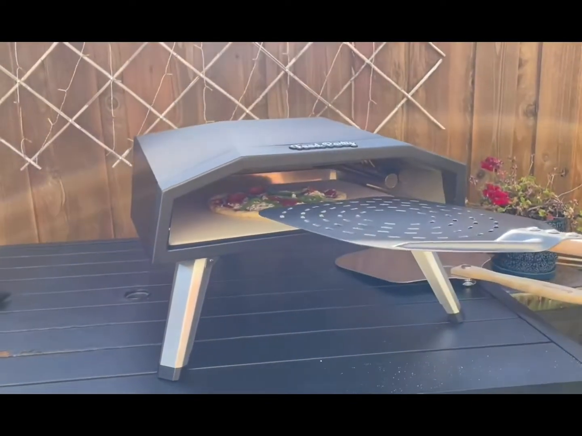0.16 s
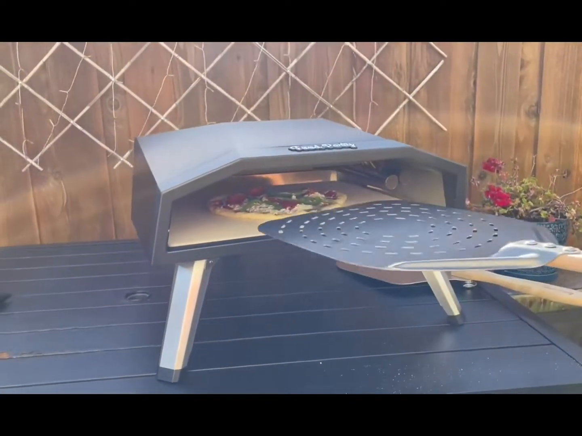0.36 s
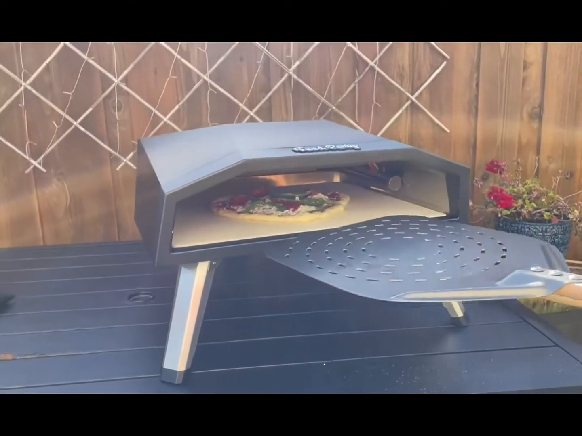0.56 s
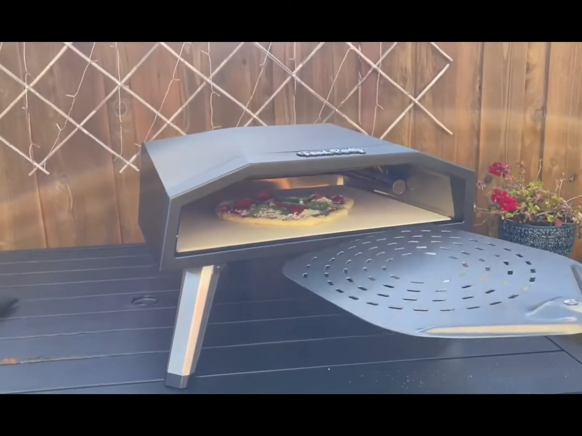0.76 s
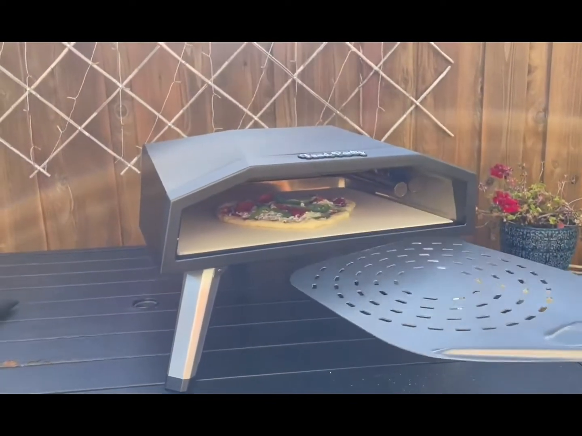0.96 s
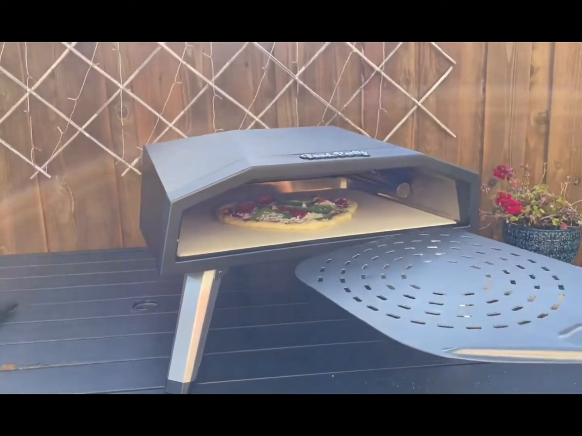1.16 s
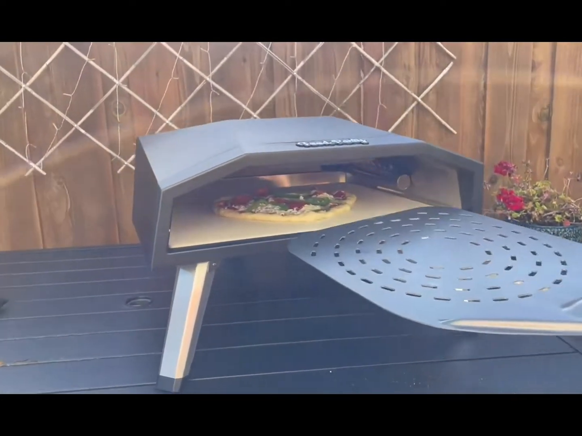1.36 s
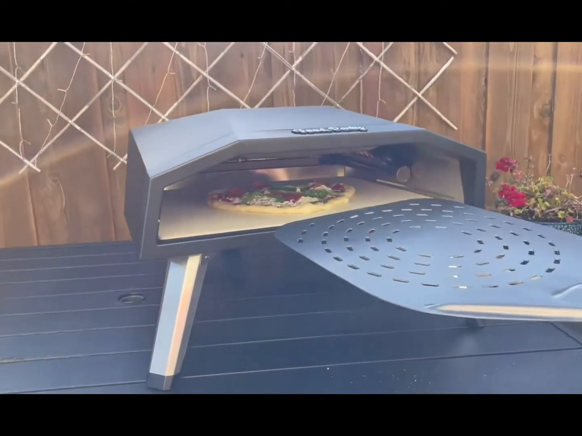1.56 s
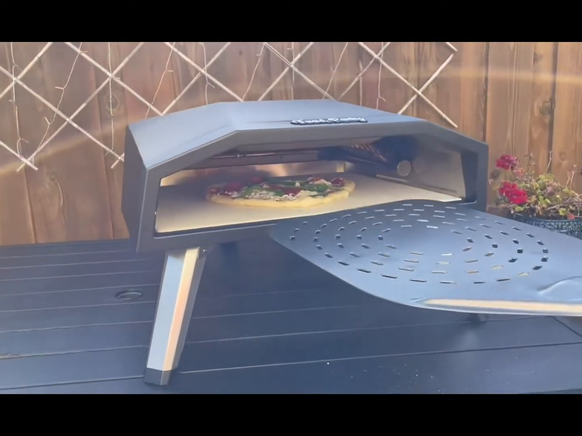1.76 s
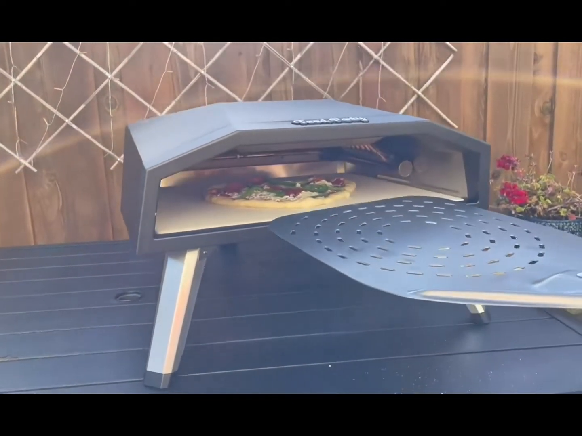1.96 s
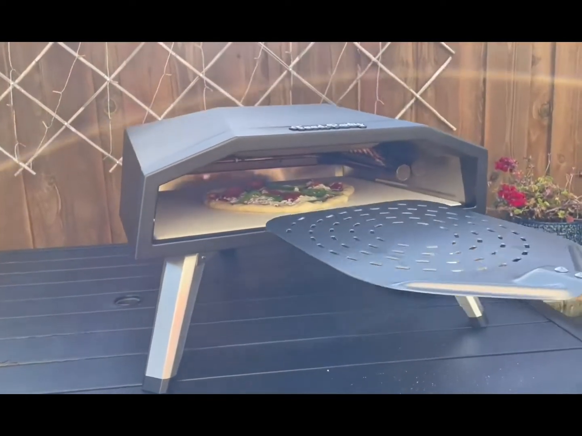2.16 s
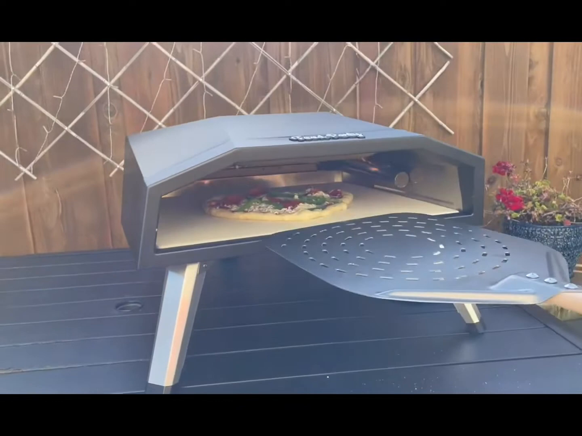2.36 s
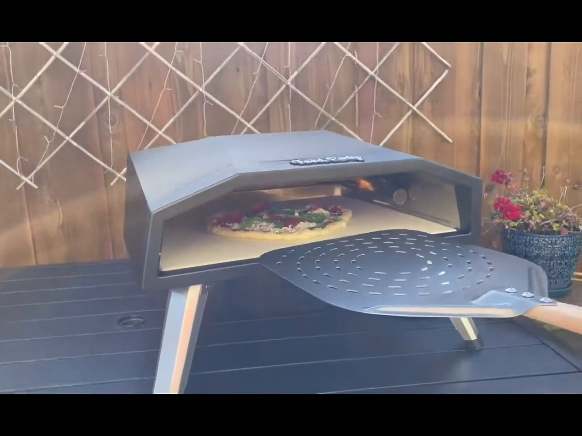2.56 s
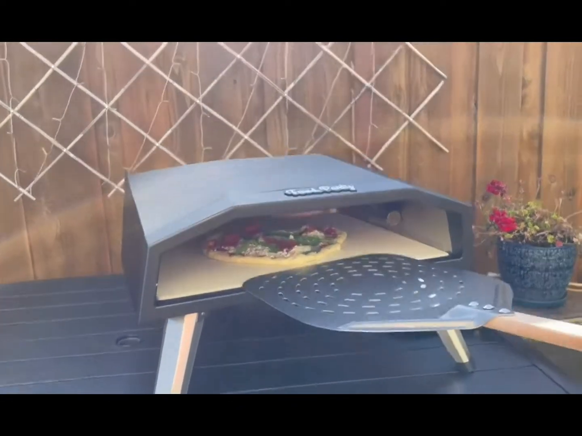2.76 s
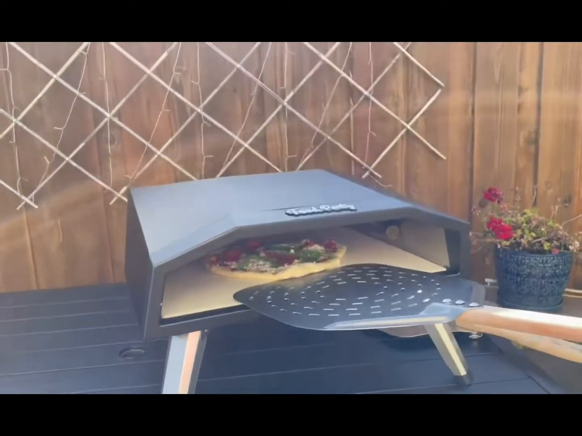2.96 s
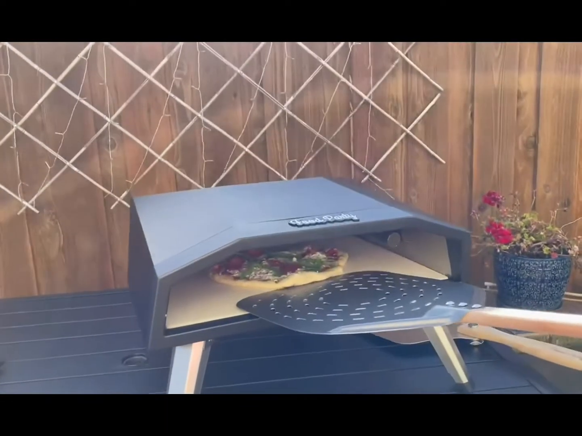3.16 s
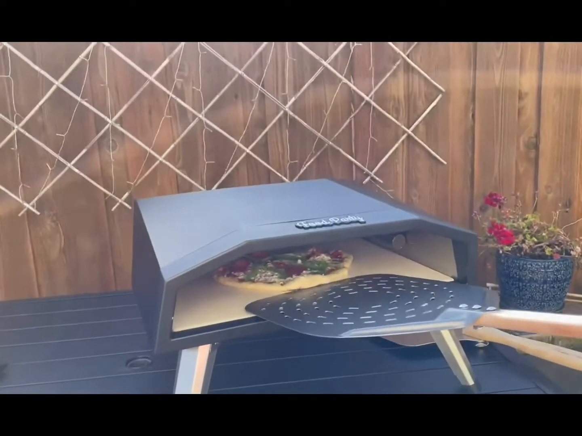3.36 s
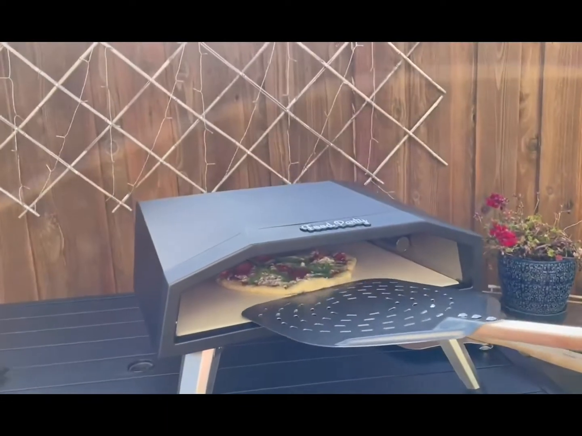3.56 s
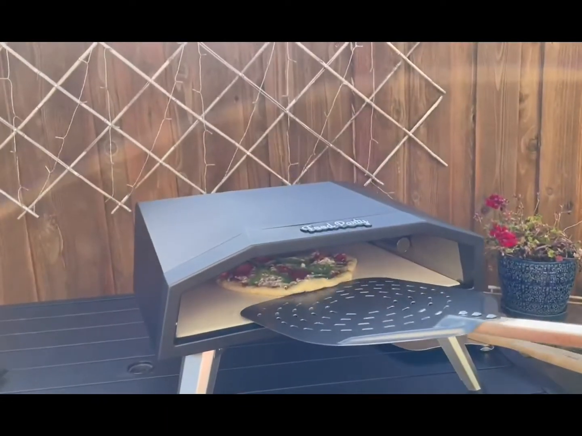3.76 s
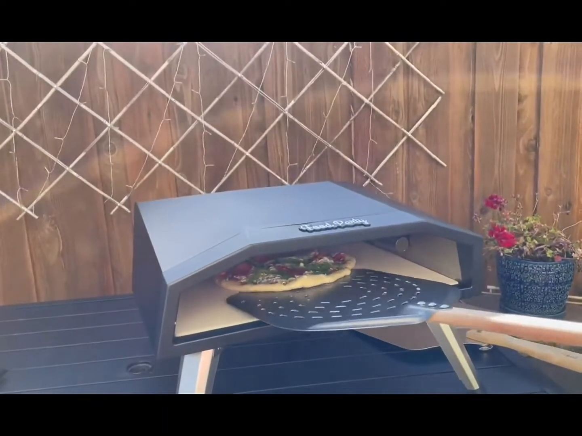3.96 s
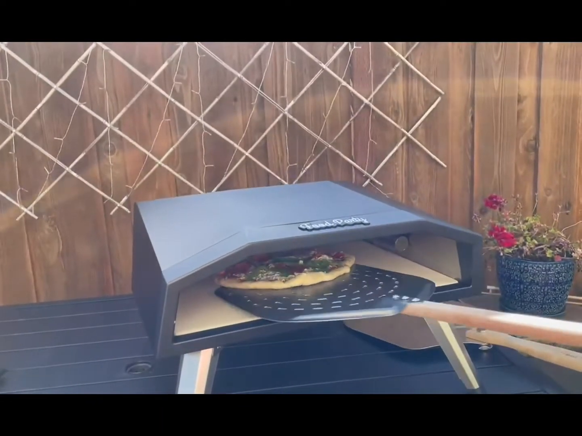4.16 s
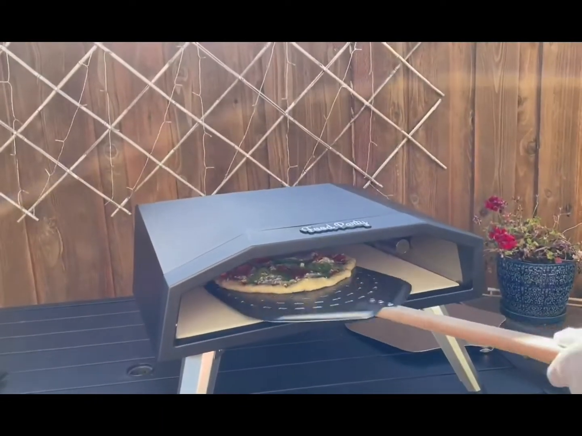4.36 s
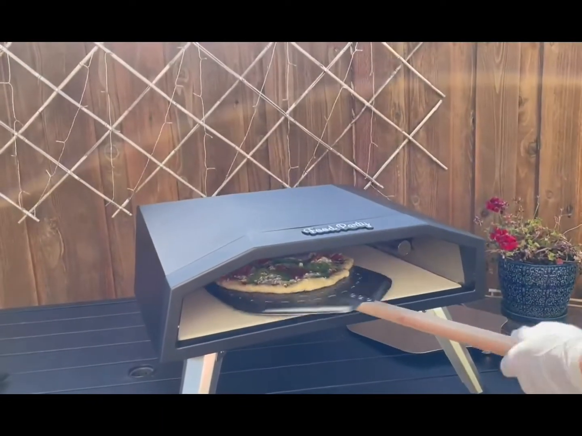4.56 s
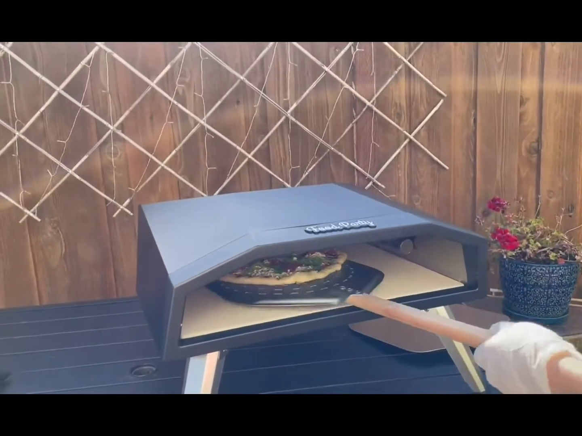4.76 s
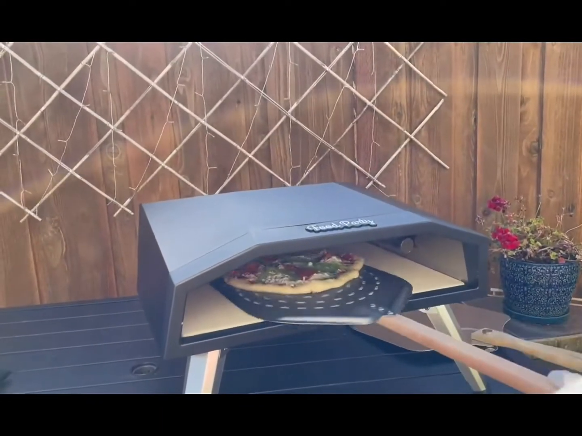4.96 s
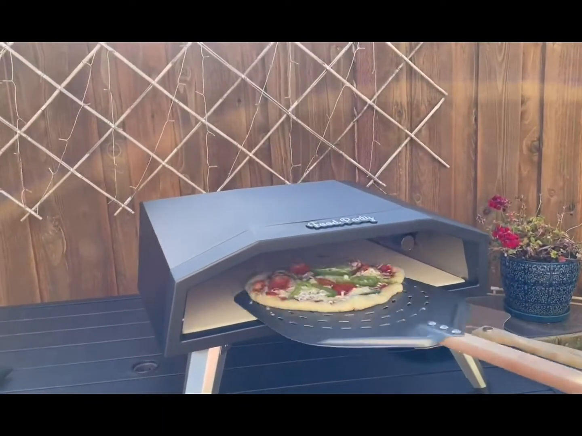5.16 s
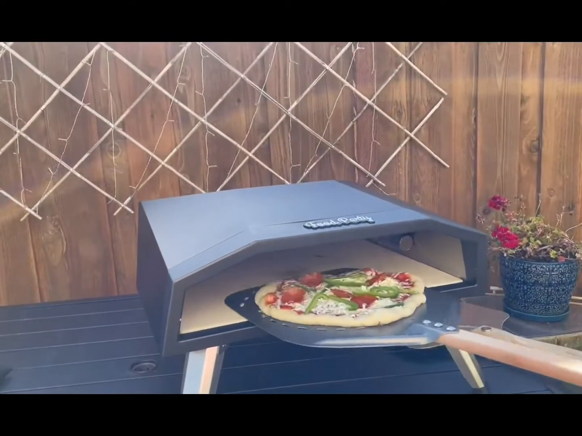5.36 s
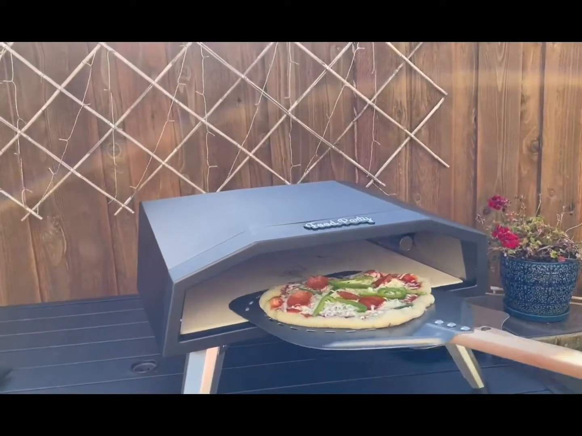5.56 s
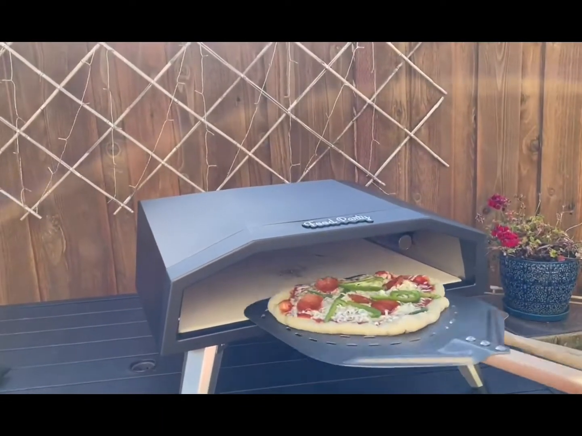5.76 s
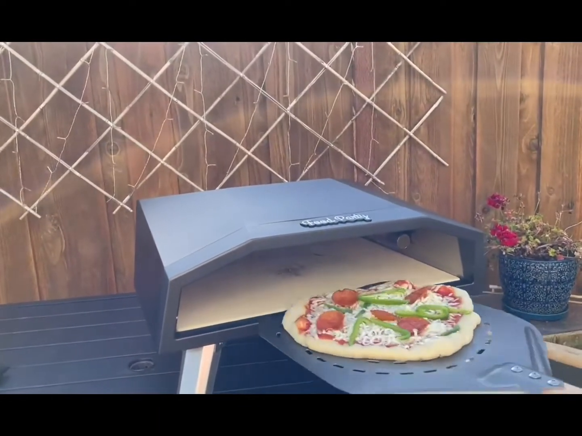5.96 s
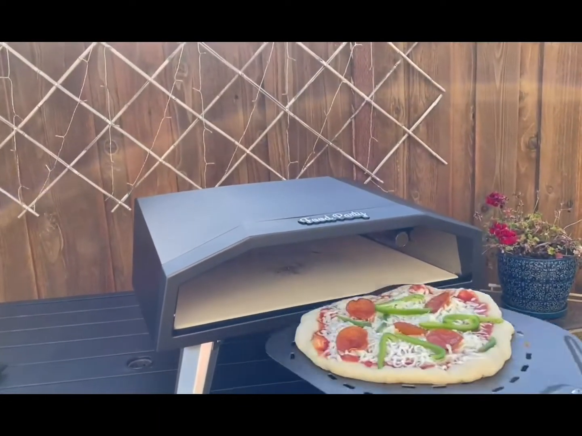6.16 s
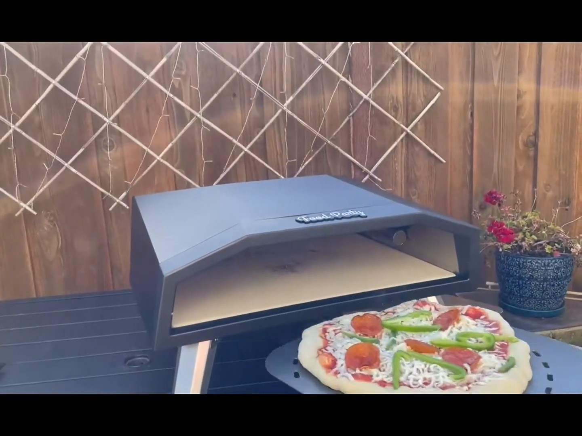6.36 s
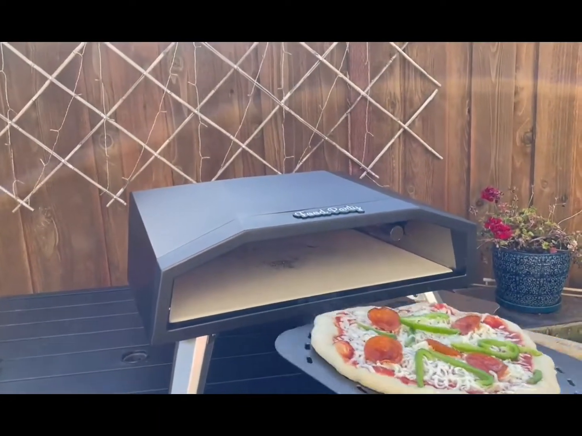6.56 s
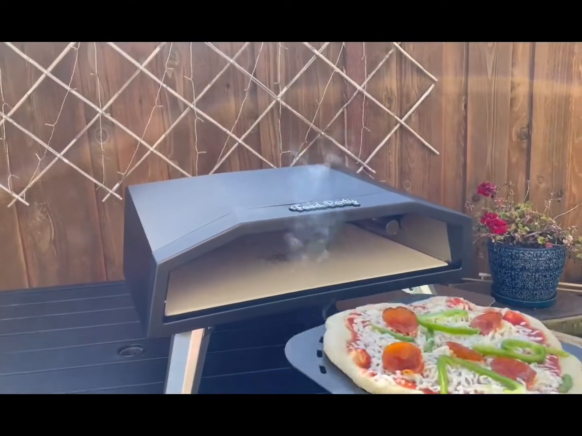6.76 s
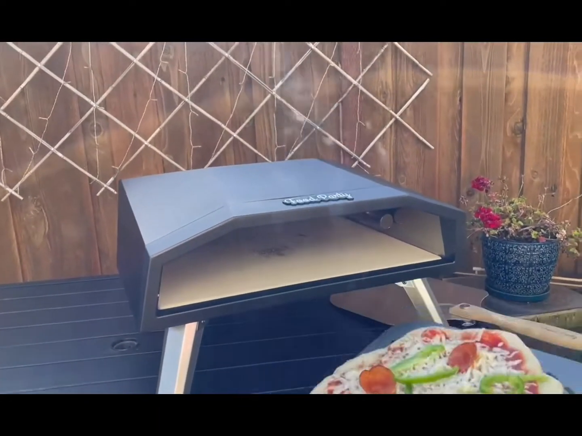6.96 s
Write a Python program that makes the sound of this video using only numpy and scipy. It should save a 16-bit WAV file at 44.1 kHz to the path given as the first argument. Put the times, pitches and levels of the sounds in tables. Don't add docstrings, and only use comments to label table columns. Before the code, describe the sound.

Close outdoor stereo sound at a small gas pizza oven: soft flame hiss and sparse hot-metal ticks first, then wind thumps as a peel edge clatters on stone. Juddering, bright, sandy scrapes follow, strongest midway, with metallic ringing and a low gust. The loaded sheet sounds duller as it draws out, with hard taps and crusty clicks. Lastly, calm air, tiny clicks and a far steady machine tone.

```python
import sys
import numpy as np
from scipy import signal
from scipy.fft import rfft, irfft, dct, next_fast_len
from scipy.io import wavfile
from scipy.ndimage import uniform_filter1d

SR = 44100
rng = np.random.default_rng(int(sys.argv[2]) if len(sys.argv) > 2 else 0)


def unload_audio(sound):
    columns = np.transpose(np.atleast_2d(sound))
    steps = np.round(np.clip(columns, -1, 1) * 32767)
    wavfile.write(sys.argv[1], SR, steps.astype(np.int16))


def rack_gain(trim_db):
    fader = np.asarray(trim_db, float)
    return 10 ** (fader / 20)


N = 310023


def rms_one(x):
    return x / np.sqrt(np.mean(x ** 2) + 1e-20)


def in_time(rows, outside_db=None):
    s, *columns = np.transpose(rows)
    return [np.interp(np.arange(N) / SR, s, c, outside_db, outside_db) for c in columns]


def colour(x, points):
    hz, level_db = np.transpose(points)
    bins = np.arange(N // 2 + 1) * SR / N + 1
    gain = rack_gain(np.interp(np.log(bins), np.log(hz), level_db, -90, -90))
    return rms_one(irfft(rfft(x) * gain, N))


def drift(rate_hz):
    r = np.exp(-64 * np.pi * rate_hz / SR)
    noise = rng.standard_normal(N // 32 + 2002)
    slow = signal.lfilter([1], [1, -2 * r, r * r], noise)[2000:]
    return np.interp(np.arange(N) / 32, np.arange(len(slow)), rms_one(slow))


def ring(x, hz, t60):
    r, w = rack_gain(-60 / (t60 * SR)), 2 * np.pi * hz / SR
    return signal.lfilter([0, np.sin(w)], [1, -2 * r * np.cos(w), r * r], x + 1e-18)


def band(x, low_hz, high_hz):
    return signal.sosfilt(signal.butter(2, [low_hz, min(high_hz, .45 * SR)], "band", fs=SR, output="sos"), x)


def bursts(times, levels_db, t60s, rises):
    out, t = np.zeros(N), np.arange(SR // 4) / SR
    for s, level_db, t60, rise in np.broadcast(times, levels_db, t60s, np.maximum(rises, 1e-4)):
        i = round(s * SR)
        fall = rack_gain(level_db - 60 * np.maximum(t - rise, 0) / max(t60, .002))
        shape = fall * np.minimum(t / rise, 1) ** 2
        out[i:i + len(t)] += shape[:N - i]
    return out


def swells(rows, power):
    out = np.zeros(N)
    for s, rise, fall, level_db in rows:
        i = np.arange(max(round((s - rise) * SR), 0), min(round((s + fall) * SR), N))
        away = np.where(i < s * SR, (s - i / SR) / rise, (i / SR - s) / fall)
        out[i] += rack_gain(level_db) * np.cos(np.pi / 2 * np.clip(away, 0, 1)) ** power
    return out


def grains(per_s, spread_db):
    sizes = rack_gain(spread_db * np.minimum(rng.exponential(1, N), 5)) * rng.choice([-1, 1], N)
    return sizes * (rng.random(N) < per_s / SR)


def sheet(force, modes, wander_db):
    return sum(ring(force * rack_gain(level_db + wander_db * drift(1.8)), hz, t60) * (-1) ** k
               for k, (hz, level_db, t60) in enumerate(modes))


# f/Hz, level/dB, time to fade by 60 dB [s]
SHEET_MODES = [(632, -12, .18), (764, -15, .16), (1071, -19, .25), (1400, -16, .35), (1723, -15, .22),
               (2207, -20, .15), (2392, -20, .2), (2572, -11, .3), (2840, -12, .12), (3058, -13, .12),
               (3312, -8, .28), (3494, -13, .18), (3850, -14, .08), (4088, -10, .12), (4420, -13, .15),
               (4865, -15, .09), (5322, -8, .16), (5920, -12, .13), (6400, -11, .12)]
# f/Hz, level/dB per Hz
BODY_COLOUR = [(250, -37), (500, -7), (1000, -6), (1600, -4), (2400, -4), (3500, -0.5), (5300, -1.5),
               (8000, -6)]
# f/Hz, level/dB per Hz
GRIT_COLOUR = [(5000, -10.5), (7500, -8), (10000, 0.5), (11500, -0.5), (13200, 1), (14300, -6.5),
               (15000, -9), (16000, -14), (17500, -58)]


def peel():
    (grit, pressure), (crack, rattle) = scrape(), taps()
    hiss = (grit + crack) * colour(grains(9000, spread_db=2.0), GRIT_COLOUR)
    friction = grains(4000, spread_db=2.6)
    loaded_db = in_time([(2.6, 5), (3.6, -1), (4.1, -6), (4.6, -8), (5.4, -11)])[0]
    rubbing = rack_gain(-3.0) * (pressure + rattle) * colour(friction, BODY_COLOUR)
    body = dense_modes(rubbing, friction, 0.45 * loaded_db)
    drive = rack_gain(-43) * pressure + rack_gain(-42) * rattle
    force = rack_gain(loaded_db) * drive * rms_one(grains(3000, spread_db=3.5))
    ringing = sheet(force, SHEET_MODES, wander_db=3.5)
    return patchy(hiss, 7000, 16000, patch_db=1.0) + patchy(body, 600, 7440, patch_db=1.0) + ringing


# fastest moment t/s, speeding up [s], slowing [s], grit hiss level/dB,
# sheet body level/dB relative to the hiss
PUSHES = [(2.425, 0.0086, 0.13, -48, 0), (2.624, 0.021, 0.11, -38.5, 0), (2.703, 0.071, 0.078, -41, -2),
          (2.859, 0.17, 0.15, -31.5, -11.5), (3.063, 0.079, 0.048, -34.5, -10),
          (3.155, 0.063, 0.11, -39, -8), (3.327, 0.061, 0.23, -43.5, -9.5), (3.443, 0.094, 0.18, -39, -9.5),
          (3.59, 0.081, 0.062, -37.5, -11.5), (3.645, 0.098, 0.086, -30.5, -12),
          (3.69, 0.057, 0.024, -35, -9), (3.765, 0.08, 0.064, -32, -11), (3.805, 0.05, 0.053, -33.5, -14),
          (3.915, 0.11, 0.13, -24, -8.5), (3.96, 0.032, 0.012, -35, -5), (4.128, 0.057, 0.045, -31.5, -7.5),
          (4.165, 0.057, 0.096, -28.5, -5), (4.257, 0.015, 0.034, -42.5, -5),
          (4.325, 0.036, 0.061, -35, -4), (4.37, 0.058, 0.11, -31.5, -4), (4.55, 0.056, 0.088, -39, -3.5),
          (4.625, 0.099, 0.09, -40, -3.5), (4.892, 0.18, 0.048, -41, -6.5)]
DRAWS = [(5.012, 0.4, 0.47, -64, 9), (5.143, 0.047, 0.017, -39, -11), (5.173, 0.027, 0.047, -37.5, -10.5),
         (5.23, 0.029, 0.036, -34.5, -11.5), (5.318, 0.11, 0.077, -36, -9),
         (5.451, 0.11, 0.037, -35.5, -5.5), (5.52, 0.068, 0.065, -45, -4),
         (5.582, 0.056, 0.021, -48.5, 1.5), (5.657, 0.044, 0.11, -50.5, -10), (5.741, 0.13, 0.12, -36, -5),
         (5.893, 0.063, 0.078, -36, -3), (5.981, 0.043, 0.015, -46, -6), (6.84, 0.18, 0.16, -65.5, 5.5)]


def scrape():
    strokes = PUSHES + DRAWS
    hiss = swells([row[:4] for row in strokes], power=2.7)
    body_rows = [(s, rise, fall, hiss_db + body_db) for s, rise, fall, hiss_db, body_db in strokes]
    body = swells(body_rows, power=2.4)
    hiss, body = creeping(hiss), creeping(body)
    judder_db = 1.5 * drift(18.4) + 1.2 * drift(70)
    return hiss * rack_gain(judder_db + 1.3), body * rack_gain(judder_db - 0.08 + 0.51 * drift(28))


def creeping(x):
    drag_db, drag_s = -21.5, 0.067
    step = 1 / (drag_s * SR)
    return x + rack_gain(drag_db) * signal.lfilter([step], [1, step - 1], x + 1e-18)


# t/s, peak level/dB, rattle level/dB relative, rattle time to fade by 60 dB [s]
TAPS = [(2.423, -18, -7.5, 0.04), (2.428, -21.5, -9, 0.03), (2.4483, -12.5, -12.5, 0.031),
        (2.457, -20.5, -13, 0.035), (2.616, -12.5, -14.5, 0.015), (2.989, -35, -6, 0.015),
        (3.254, -27.5, -18, 0.03), (3.434, -20, -22, 0.035), (3.441, -23, -20, 0.04),
        (3.456, -24, -16, 0.04), (3.47, -30.5, -13, 0.03), (4.0954, -28, -40, 0.063),
        (4.13, -27, -12, 0.024), (4.4906, -26, -7.5, 0.02), (4.515, -32.5, -2, 0.04),
        (4.5345, -32, -5.5, 0.033), (4.76, -44, 6.5, 0.03), (4.881, -21, -5, 0.012),
        (5.018, -31.5, -2.5, 0.017), (5.0713, -40, -9, 0.24), (5.129, -30, -19, 0.044),
        (5.1347, -26, -36, 0.082), (5.2254, -20, -12, 0.036), (5.284, -37, -9.5, 0.028),
        (5.3974, -38, -9, 0.03), (5.456, -24, -9, 0.03), (5.4628, -9.5, -16, 0.022),
        (5.472, -22, -14, 0.04), (5.6477, -27, -3, 0.022), (5.7504, -6, -20.5, 0.03),
        (5.76, -23, -11, 0.034), (5.8433, -26.5, -3, 0.031), (5.876, -20.5, -7, 0.026),
        (5.986, -33, -12, 0.014)]


def taps():
    rise_s = 0.0037
    s, peak_db, rattle_db, t60 = np.transpose(TAPS)
    start = s - rise_s + 0.0012
    crack = bursts(start, peak_db - 6.0, 0.23 * t60, rise_s)
    rattle = bursts(start, peak_db + rattle_db - 4.0, t60, rise_s)
    return crack, rattle


def dense_modes(x, noise, free_db):
    t60_s, level_db = 0.18, 1
    answer = noise[:SR // 4] * rack_gain(-60 * np.arange(SR // 4) / SR / t60_s)
    answer = answer / np.sqrt(np.sum(answer ** 2))
    return x + rack_gain(level_db) * signal.fftconvolve(x * rack_gain(free_db), answer)[:N]


def patchy(x, low_hz, high_hz, patch_db):
    edges = np.geomspace(low_hz, high_hz, num=9)
    return x + sum((rack_gain(patch_db * drift(6.3)) - 1) * band(x, low, high) for low, high in zip(edges, edges[1:]))


# f/Hz, half width [Hz]
STILL = [(2400, 35), (2990, 45), (3520, 45), (4150, 40), (5560, 30), (6120, 70)]
# t/s, depth [0-1]
STILL_SHARE = [(2.65, 0), (2.75, .9), (3.9, .9), (4.1, .3), (6, .15)]


def notched(x):
    depth, t = in_time(STILL_SHARE)[0], np.arange(N) / SR
    for k, (hz, half_hz) in enumerate(STILL):
        sway = np.clip(.8 + .5 * np.sin(2 * np.pi * (1.9 + .6 * k) * t + k), 0, 1)
        x = x - depth * sway * band(x, hz - half_hz, hz + half_hz)
    return x


# t/s, length [s], f/Hz, level/dB
SINGING = [(2.725, 0.17, 3800, -47.5), (3.15, 0.048, 3230, -66), (3.497, 0.11, 5380, -50),
           (3.516, 0.19, 3290, -51.5), (3.85, 0.12, 4410, -41), (3.56, 0.078, 5330, -50),
           (4.6, 0.056, 3200, -48), (2.84, 0.036, 3500, -43), (3.3, .1, 4600, -53),
           (2.817, 0.077, 4840, -41.5), (4, 0.13, 5320, -50), (4.13, 0.064, 4000, -47),
           (2.79, 0.1, 5300, -48), (2.9, 0.057, 4950, -44), (3.03, 0.055, 5200, -48),
           (4.313, 0.088, 630, -45.5), (4.884, 0.035, 4090, -38), (4.784, 0.1, 4280, -46),
           (5.5, .055, 3720, -46), (4.5, 0.023, 2580, -47), (4.97, .07, 2200, -58),
           (5.727, 0.022, 3380, -40)]


def singing():
    out, t, noise = np.zeros(N), np.arange(N) / SR, rng.standard_normal(N)
    for s, length, hz, level_db in SINGING:
        swell = np.sin(np.pi * np.clip((t - s) / length, 0, 1)) ** .5
        out += rack_gain(level_db) * swell * rms_one(ring(noise, hz, t60=0.03))
    return out


# t/s, level/dB
LANDINGS = [
    (2.4227, -47),
    (2.449, -46),
    (2.616, -49),
]
# f/Hz, level/dB, time to fade by 60 dB [s]
FREE_SHEET = [(762, -3, .4), (949, -2, .14), (1069, -14, .6), (1398, -7, .7), (1567, -10, .45),
              (1723, -2, .25), (1960, -4, .12), (2207, -10, .4), (2390, -6.5, .55), (2546, -6, .5),
              (3058, -5, .14), (3321, -1, .7), (3490, -9, .3), (3669, -4, .11), (4151, -3, .12)]


def clang():
    force = np.zeros(N)
    for s, level_db in LANDINGS:
        force[round(s * SR)] = rack_gain(level_db)
    return sum(ring(force * rack_gain(level_db), hz, t60) * (-1) ** k
               for k, (hz, level_db, t60) in enumerate(FREE_SHEET))


# t/s, half length [s], level/dB
FLEX = [(4.241, 0.051, -49.5), (4.385, 0.085, -48), (4.455, 0.063, -47.5), (4.55, 0.052, -49),
        (4.645, 0.037, -55.5), (4.888, 0.03, -53), (5.013, 0.034, -48), (5.248, 0.16, -50.5),
        (5.47, 0.09, -48.5), (5.713, 0.093, -48.5), (5.886, 0.071, -47)]
# f/Hz, level/dB, time to fade by 60 dB [s]
FLEX_MODES = [(229, 1, 0.11), (245.4, -1, 0.19), (360, -16, 0.24), (483, -12, 0.28)]


def flex():
    boom = rms_one(sheet(rng.standard_normal(N), FLEX_MODES, wander_db=0.5))
    return rack_gain(2.0) * swells([(s, half, half, db) for s, half, db in FLEX], power=1.43) * boom


# t/s, peak level/dB, f/Hz
KNOCKS = [(2.283, -42, 2720), (2.384, -46, 3100), (4.762, -34, 2950), (5.02, -38, 3230),
          (5.732, -38.5, 3430), (5.805, -42, 2580), (5.464, -23, 4820), (5.751, -21, 5560),
          (5.877, -24, 5030), (6.7841, -44, 3160), (6.786, -52, 2290), (6.848, -47, 6250),
          (6.85, -54, 3170), (6.8859, -39.5, 3200), (6.971, -52, 6750)]
KNOCK_CLUSTER = (.89, 1, 1.07)


def knocks():
    t60_s, rise_s = .026, .001
    out, t = np.zeros(N), np.arange(SR // 20) / SR
    shape = np.minimum(t / rise_s, 1) * rack_gain(-60 * t / t60_s)
    for s, peak_db, hz in KNOCKS:
        i = round(s * SR)
        tones = sum(np.sin(2 * np.pi * hz * ratio * t) for ratio in KNOCK_CLUSTER) / 2
        out[i:i + len(t)] += (rack_gain(peak_db) * shape * tones)[:N - i]
    return out


# t/s, peak level/dB
METAL_TICKS = [(0.18, -35.5), (0.2125, -32), (0.2483, -41), (0.26, -35), (0.378, -39), (0.5107, -33.5),
               (0.642, -38), (0.6575, -37), (0.723, -37), (0.882, -36), (0.901, -38), (0.998, -38.5),
               (1.0178, -28.5), (1.2154, -38), (1.4414, -26), (1.5197, -29.5), (1.6242, -40), (1.6805, -37),
               (1.7957, -33.5), (2.097, -40)]
# t/s, peak level/dB, dull part level/dB
CRUST_CLICKS = [(0.329, -32, -9), (0.598, -31, -7.5), (0.8204, -29, -31), (1.6408, -31.5, -15),
                (1.725, -29, -15), (4.317, -36, -10), (2.2584, -31.5, -6.5), (2.281, -35, -4),
                (2.293, -28.5, -19), (2.374, -33, -9), (2.421, -30, -19), (2.571, -29, -20),
                (6.04, -38.5, -11), (6.1885, -44, -31), (6.321, -34.5, -7), (6.785, -48, -11),
                (6.8054, -44, -4), (6.848, -44, 0.5), (6.8872, -50, -8), (6.918, -51, 1),
                (2.1614, -42, -20), (2.186, -41, -14), (2.226, -44, -20), (2.3253, -39, -20),
                (2.382, -32, -7), (4.098, -32, -15), (4.688, -38, -20), (5.003, -31, -16),
                (5.1712, -25, -10.5), (5.3034, -22, -12), (5.4086, -25, -11), (5.703, -21, -13),
                (5.733, -24, -9), (5.8738, -17.5, -7)]


def ticks():
    metal_dull_db = -11.5
    s, peak_db, dull_db = np.transpose([(s, db, metal_dull_db) for s, db in METAL_TICKS] + CRUST_CLICKS)
    sharp_noise = rms_one(band(rng.standard_normal(N), 8600, 15700))
    dull_noise = rms_one(band(rng.standard_normal(N), 2800, 8600))
    top = bursts(s, peak_db - 3.5, 0.0069, 0.00068) * sharp_noise
    dull = bursts(s, peak_db + dull_db - .1, 0.0088, 0.00039) * dull_noise
    return top + dull


# t/s, low murmur level/dB, flame hiss level/dB
AIR = [(0, -58, -59.5), (1, -56, -59), (2.4, -56.5, -60), (4, -56, -53), (6, -55, -61.5), (7.03, -57, -62)]
# f/Hz, level/dB per Hz
FLAME_HISS = [(900, -60), (2000, -8), (4000, -7), (7000, -7.5), (10000, -5.5), (13000, -2), (15000, -6.5),
              (17000, -51)]


def flame():
    flicker_db = .7 * drift(9)
    hz, width_hz, level_db = 7980, 140, -74.5
    hiss = rack_gain(in_time(AIR)[1] + 0.5 + flicker_db) * colour(grains(12000, spread_db=3.5), FLAME_HISS)
    whistle = rms_one(band(rng.standard_normal(N), hz - width_hz / 2, hz + width_hz / 2))
    return hiss, rack_gain(level_db) * whistle


def oven(x, size):
    t60_s, t = 0.034, np.arange(SR // 8) / SR
    echoes = rng.standard_normal((4, 2, len(t))) * rack_gain(-60 * t / t60_s) * (t > .0006)
    echoes /= np.sqrt(np.sum(echoes ** 2, axis=2, keepdims=True))
    shares = np.array([drift(9) for pattern in echoes])
    shares /= np.sqrt(np.sum(shares ** 2, axis=0))
    return np.sum(rfft(x * shares, size)[:, None] * rfft(echoes, size), axis=0)


# f/Hz, left lag [rad], direct share [0-1], left minus right level/dB
PORTS = [(99.5, -1, 0.99, -2.5), (706, 0.42, 0.79, 3), (1680, -1, 0.12, 3.5), (2000, -0.5, 0.78, 0.5),
         (4130, 0.3, 0.65, 1.5), (5380, 1.32, 0.6, 1.5), (5700, 1.94, 0.8, -1.5), (6940, 1.17, 0.54, 0),
         (7570, 2.5, 0.73, 1.2), (8550, 3.1, 0.89, 1.1), (9440, 3.5, 0.8, -1.2), (11300, 4.5, 0.6, 1),
         (12360, 5.5, 0.7, -1.5), (13260, 6, 0.9, 0.6), (17100, 7.5, 0.9, -1)]


def ports(x):
    size = next_fast_len(N + SR // 4)
    hz, *columns = np.transpose(PORTS)
    lag, direct, pan_db = [np.interp(np.arange(size // 2 + 1) * SR / size, hz, c) for c in columns]
    direct = np.clip(direct, 0, 1)
    straight = np.sqrt(direct) * np.exp(-1j * lag * [[1], [0]]) * rfft(x, size)
    heard = straight + np.sqrt(1 - direct) * oven(x, size)
    return irfft(heard * rack_gain(pan_db * np.array([[.5], [-.5]])), size)[:, :N]


# t/s, rumble level/dB
BREEZE = [
    (0, -63.5),
    (.6, -54),
    (1.6, -58.5),
    (2.5, -51.5),
    (3.0, -58),
    (3.55, -38),
    (3.7, -59),
    (4.4, -57.5),
    (6.2, -51.5),
    (7.03, -55),
]
# t/s, half length [s], level/dB
LUMPS = [(0.08, 0.063, -63), (0.297, 0.05, -50.5), (0.412, 0.038, -67), (0.675, 0.024, -36.5),
         (0.758, 0.058, -62), (0.897, 0.026, -60.5), (1.477, 0.036, -46.5), (1.61, 0.029, -61),
         (1.762, 0.068, -48.5), (1.857, 0.047, -38.5), (2.008, 0.045, -48.5), (2.084, 0.022, -37),
         (2.177, 0.078, -36.5), (2.278, 0.062, -29.5), (2.416, 0.12, -38.5), (2.645, 0.17, -42.5),
         (2.8, 0.13, -37.5), (2.952, 0.13, -38.5), (3.117, 0.083, -33.5), (3.226, 0.074, -35.5),
         (3.359, 0.027, -28.5), (3.472, 0.036, -44.5), (3.724, 0.042, -51), (3.94, 0.03, -58),
         (4.12, 0.036, -64.5), (4.392, 0.042, -59), (4.923, 0.052, -43.5), (6.96, 0.18, -57)]
# f/Hz, level/dB per Hz
RUMBLE = [(12, -56), (26, -34), (48, 0), (66, 4), (102, -1.5), (145, -4.5), (177, -5.5), (400, -25.5),
          (520, -47), (880, -120)]
# t/s, peak level/dB, first cycle [ms]
BUFFETS = [(1.911, -42, 0.96), (2.077, -33, 2.1), (2.205, -30.5, 1.6), (2.251, -15, 1.57),
           (2.399, -29, 1.66), (2.425, -43, 1.3), (2.443, -24.5, 1.58), (2.601, -29.5, 0.99),
           (2.659, -19, 1.22), (2.684, -24.5, 1.3), (2.794, -24, 1.06), (2.841, -22, 1.42),
           (2.866, -24, 1.2), (2.947, -33, 1.2), (2.984, -25.5, 1.48), (3.049, -24.5, 1.55),
           (3.096, -17.5, 0.74), (3.214, -23, 1.5), (3.238, -31.5, 1.53), (3.269, -41, 0.86),
           (3.34, -30, 1.37), (3.369, -46, 1.7), (3.406, -32.5, 1.4), (3.455, -33.5, 1.2),
           (3.503, -31, 1.3), (4.333, -45, 0.61)]


def wind():
    calm_db, under_rumble_db, trail_db, trail_t60_s = -59, -19, -11, 0.072
    gust = rack_gain(in_time(BREEZE)[0]) + swells([(s, half, half, db) for s, half, db in LUMPS], power=1.57)
    s, peak_db, cycle_ms = np.transpose(BUFFETS)
    trails = bursts(s, peak_db + trail_db, trail_t60_s, 0.0039)
    shared, own = rng.standard_normal((2, N))
    pressure = evened(colour(shared + 0.24 * own * [[1], [-1]], RUMBLE), span_s=0.035, share=0.3)
    rumble = gust * rack_gain(0.5 + 2.05 * drift(14.6)) * pressure
    eddies, stray = [band(signal.fftconvolve(grains(350, spread_db=2.1), puff(1.6))[:N], 222, 645)
                     for port in range(2)]
    flutter = rack_gain(calm_db) + rack_gain(under_rumble_db) * gust + trails
    return rumble + flutter * rms_one(eddies + 0.31 * stray * [[1], [-1]]) + puffs() * rack_gain([[.6], [-.6]])


def evened(x, span_s, share):
    level = np.sqrt(uniform_filter1d(np.mean(x ** 2, axis=0), int(span_s * SR)) + 1e-9)
    return rms_one(x / level ** share)


def puffs():
    out = np.zeros(N)
    for s, peak_db, cycle_ms in BUFFETS:
        i = round((s + 0.0017) * SR)
        out[i:i + SR // 8] += rack_gain(peak_db - 3) * puff(cycle_ms)
    return out


def puff(cycle_ms):
    t = np.arange(SR // 8) / SR
    cycles = np.log(1 + 1400 * t / cycle_ms) / np.log(2.4)
    onset = 1 - np.exp(-(1300 * t / cycle_ms) ** 2)
    return rack_gain(-420 * t) * onset * np.sin(2 * np.pi * cycles)


# f/Hz, level/dB per Hz
AIR_LOW = [(59, -25), (100, -7), (409, -10.5), (609, -2.5), (683, -4), (895, -6), (1880, -18),
           (3000, -31.5), (3900, -23), (6600, -120)]


def air():
    low_db = in_time(AIR)[0]
    shared, own = rng.standard_normal((2, N))
    return rack_gain(low_db + 0.23 * drift(5.9)) * colour(shared + 0.99 * own * [[1], [-1]], AIR_LOW)


# t/s, level/dB
HUM = [
    (6.1, -72),
    (6.18, -69.5),
    (6.4, -61),
    (6.7, -59.5),
    (7.03, -55),
]


def hum():
    phase = 2 * np.pi * 754 * np.arange(N) / SR + 0.24 * drift(3.7)
    level = rack_gain(in_time(HUM, outside_db=-120)[0] + 3.5 + 1.9 * drift(4.4))
    return level * np.sin(phase) * rack_gain([[1.5], [-1.5]])


def scene():
    sounds = notched(peel()) + singing() + flex() + ticks() + clang() + knocks()
    hiss, whistle = flame()
    return ports(sounds + hiss) + whistle * np.array([[1.6], [-.5]]) + wind() + air() + hum()


# f/Hz, level/dB
DEAD_ZONE = [(200, -26), (800, -22), (1600, -12), (2500, -9), (6000, -9), (8500, -13), (11000, -15),
             (13000, -17), (14000, -11), (15500, -5)]
# t/s, extra margin level/dB
SPARE_MARGIN = [(2.38, 0), (2.42, 6), (2.88, 5), (2.95, 0)]


def joint_stereo(x, mask_db, floor_hz):
    first = 659
    top_hz, top_spread_hz = 15650, 380
    slope = np.cumsum(np.kaiser(1025, 4 * np.pi))
    slope = np.sqrt(slope[:-1] / slope[-1])
    padding = [(0, 0), (1024 - first + 1024, 4096 - (N - first) % 1024)]
    halves = np.pad([x[0] + x[1], x[0] - x[1]], padding).reshape(2, -1, 1024)
    early, late = halves[:, :-1] * slope, halves[:, 1:] * slope[::-1]
    fold = [-late[..., 511::-1] - late[..., 512:], early[..., :512] - early[..., :511:-1]]
    bands = dct(np.concatenate(fold, axis=2), type=4, norm="ortho").reshape(2, -1, 64, 16)

    now = np.mean(bands ** 2, axis=3, keepdims=True)
    power = uniform_filter1d(now, size=3, axis=1)
    hz = (np.arange(64)[:, None] + .5) * SR / 128
    treble = np.sum(bands[:, :, 25:] ** 2, axis=(0, 2, 3))[:, None, None]
    steady = treble < 4.5 * np.roll(treble, 1, axis=0)
    dead_db = np.interp(hz, *np.transpose(DEAD_ZONE))
    faint = bands ** 2 < np.minimum(power, now * 2).max(axis=0) * rack_gain(2 * dead_db)

    margin_db = mask_db + 1 * rng.standard_normal(treble.shape)
    frame_s = np.arange(len(treble)) * 1024 / SR
    margin_db += np.interp(frame_s, *np.transpose(SPARE_MARGIN))[:, None, None]
    wander = np.sqrt(2) * uniform_filter1d(rng.standard_normal(treble.shape), size=2, axis=0)
    too_high = hz > top_hz + top_spread_hz * wander
    masked = (hz > floor_hz) & (power < power[::-1] * rack_gain(-2 * margin_db)) | too_high

    kept = dct((bands * ~(steady & (faint | masked))).reshape(2, -1, 1024), type=4, norm="ortho")
    tail, head = kept[..., :512], kept[..., 512:]
    rising = np.concatenate([head, -head[..., ::-1]], axis=2)[:, 1:] * slope
    falling = np.concatenate([tail[..., ::-1], tail], axis=2)[:, :-1] * slope[::-1]
    mid, side = (rising - falling).reshape(2, -1)[:, 1024 - first:1024 - first + N]
    return np.array([mid + side, mid - side]) / 2


def top_cut(x):
    return signal.sosfilt(signal.butter(12, 16990, fs=SR, output="sos"), x)


def record(dry):
    steep = signal.cheby2(12, 40, 15950 + 200, fs=SR, output="sos")
    mix = joint_stereo(signal.sosfilt(steep, dry), mask_db=7.4, floor_hz=1910)
    return top_cut(mix)


dry = scene()
out = record(dry)
unload_audio(out)
```